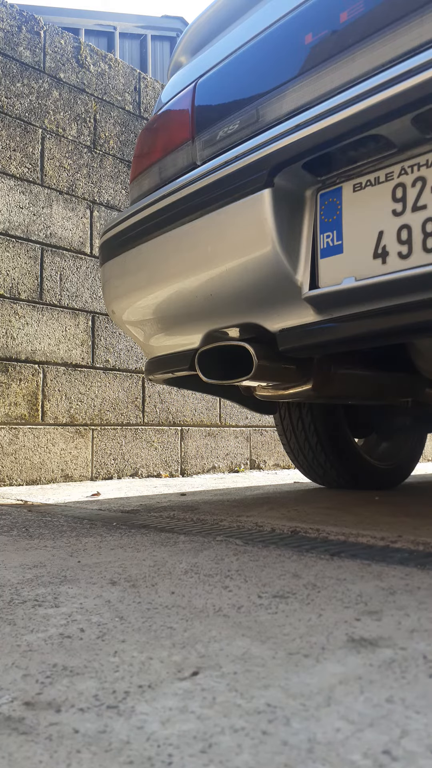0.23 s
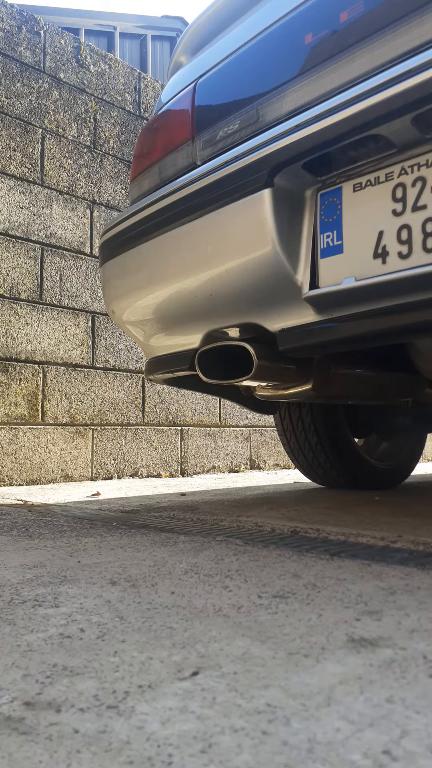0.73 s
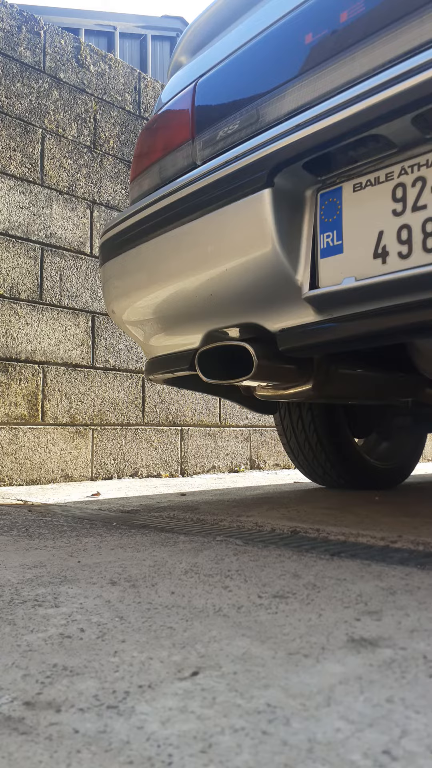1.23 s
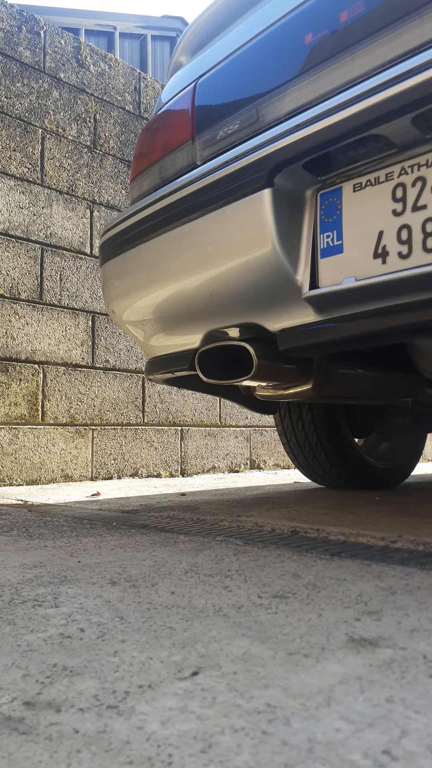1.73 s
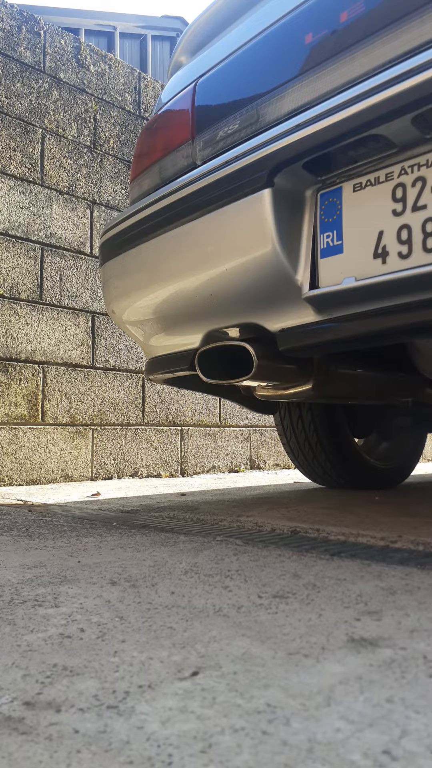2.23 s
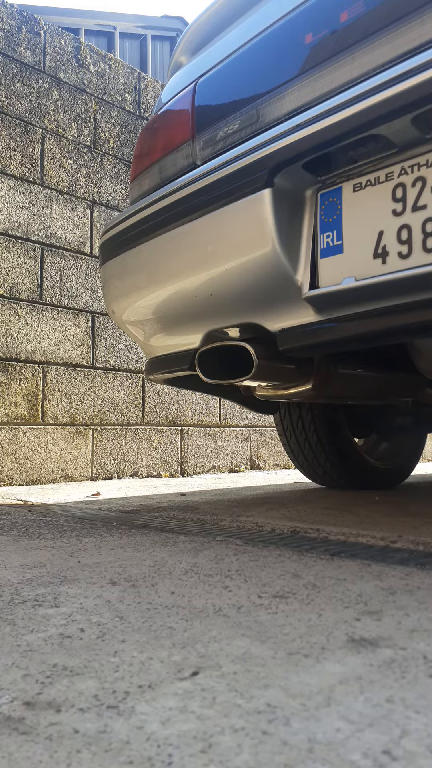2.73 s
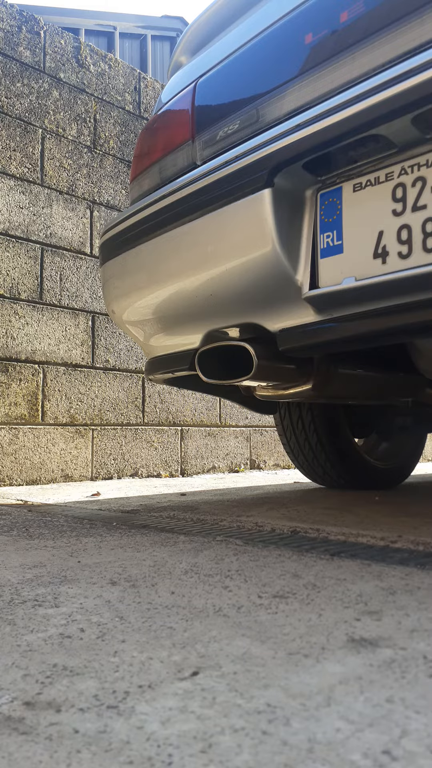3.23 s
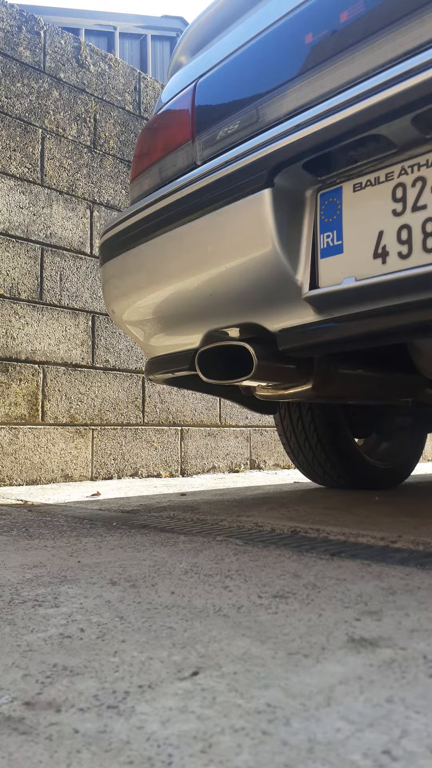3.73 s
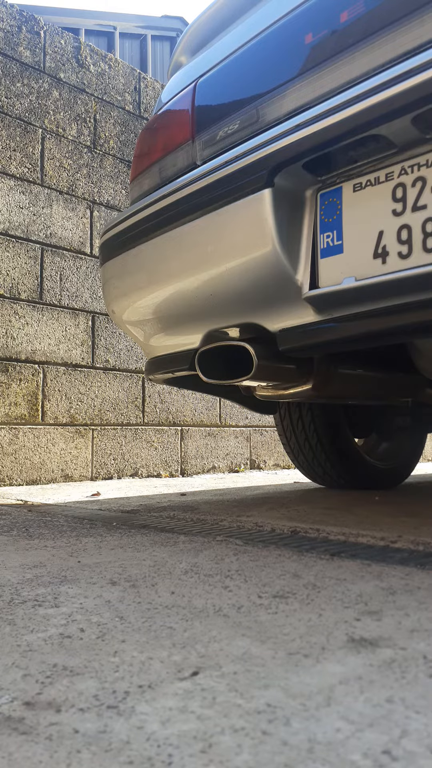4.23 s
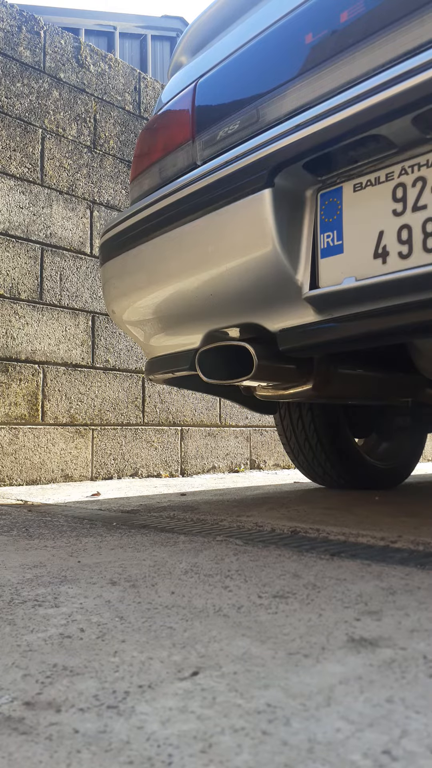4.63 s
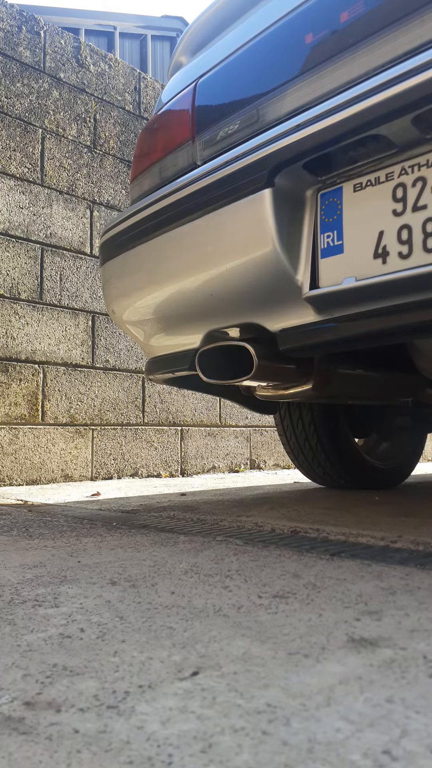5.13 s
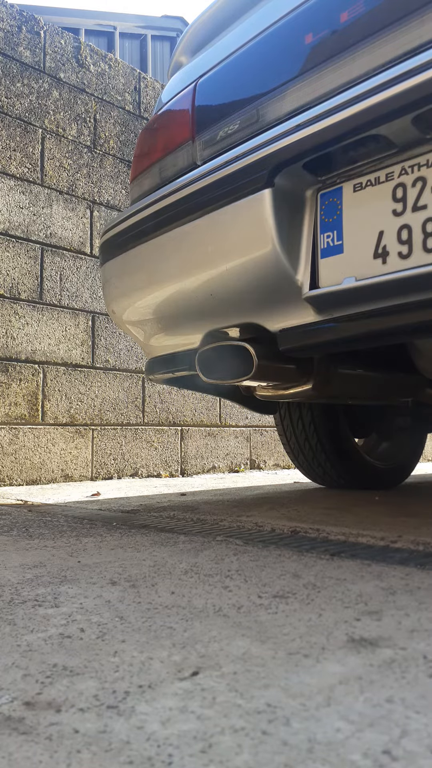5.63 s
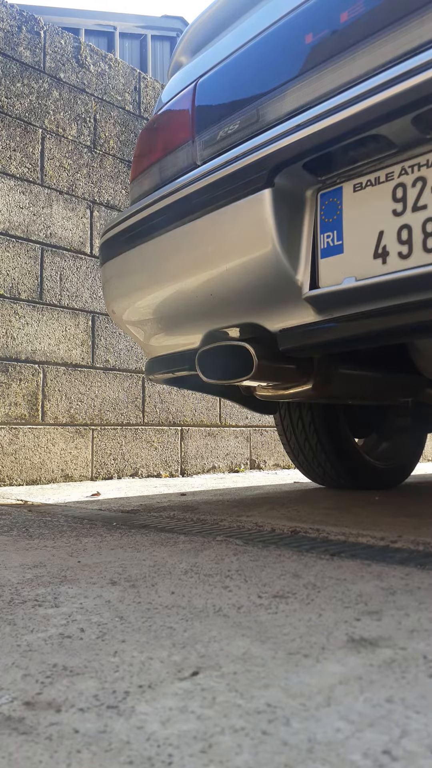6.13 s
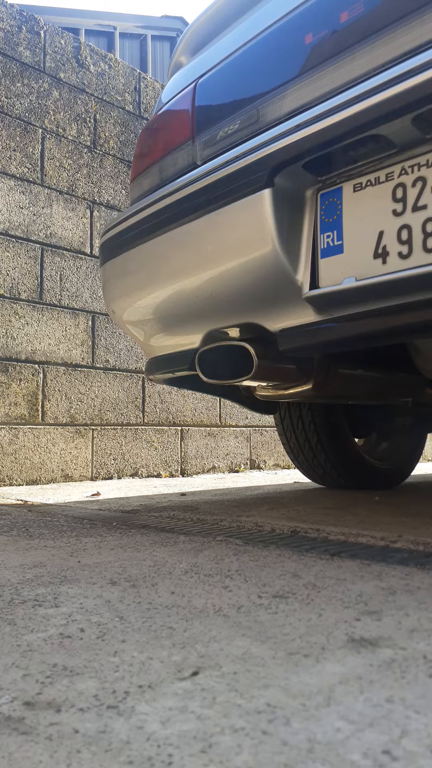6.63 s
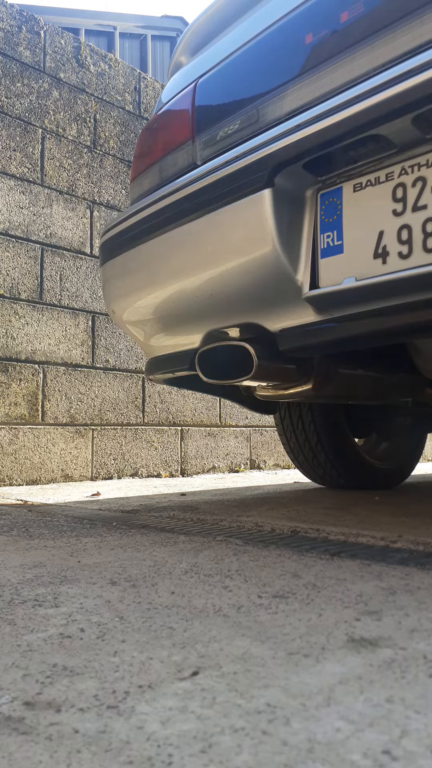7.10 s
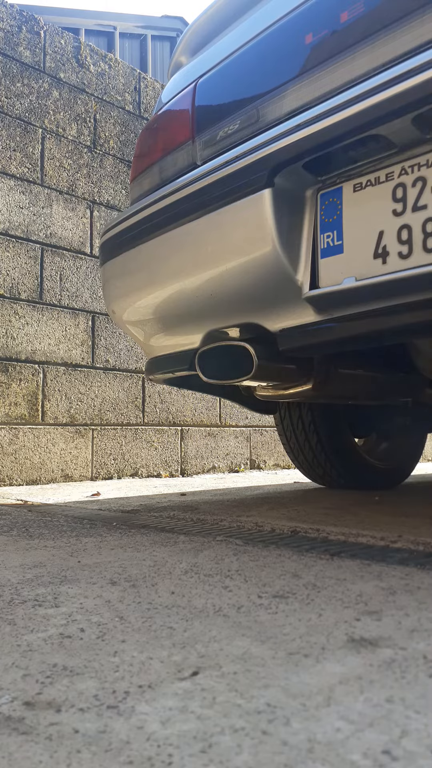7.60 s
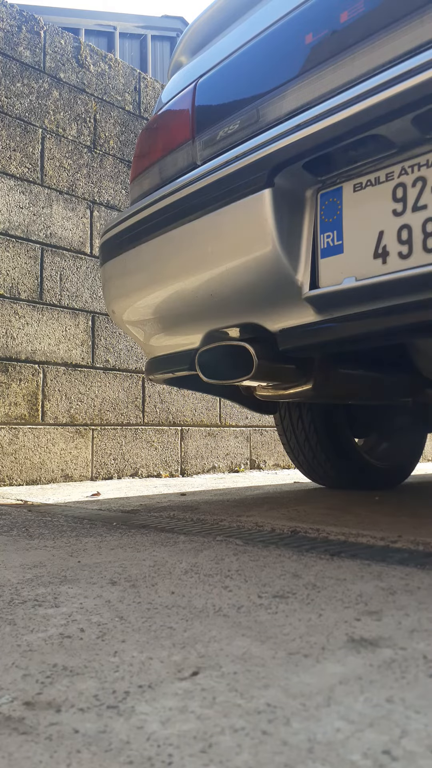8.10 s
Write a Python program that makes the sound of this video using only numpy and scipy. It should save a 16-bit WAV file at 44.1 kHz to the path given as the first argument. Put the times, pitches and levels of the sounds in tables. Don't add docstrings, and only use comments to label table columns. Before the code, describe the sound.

A car door slams, birds chirp in a walled yard, a fuel pump hums, then the starter whines briefly and the engine catches into a fast burbling idle.

```python
import sys
import numpy as np
from scipy import signal
from scipy.fft import rfft, irfft
from scipy.io import wavfile

SR = 44100
rng = np.random.default_rng(int(sys.argv[2]) if len(sys.argv) > 2 else 0)


def to_wav(s):
    ch = np.atleast_2d(s).T
    pcm = np.round(np.clip(ch, -1, 1) * 32767)
    wavfile.write(sys.argv[1], SR, pcm.astype(np.int16))


N = 368676
T, HZ = np.arange(N) / SR, np.fft.rfftfreq(N, 1 / SR) + 1e-3

# [t/s, level/dB]
STARTER = [
    (3.893, -40),
    (3.906, -30.5),
    (4.04, -29.5),
    (4.14, -33.5),
    (4.254, -26.5),
    (4.35, -32),
    (4.392, -26.5),
    (4.474, -32),
    (4.52, -26.5),
    (4.855, -30),
]


def undb(db):
    return np.exp(np.asarray(db) * np.log(10) / 20)


def unit(x):
    return x / np.sqrt(np.mean(x ** 2))


def over_hz(table):
    hz, value = np.transpose(table)
    return np.interp(np.log(HZ), np.log(hz), value)


def over_time(table, edge=0.0051):
    s, *columns = np.transpose(table)
    gate = np.clip(np.minimum(T - s[0], s[-1] + edge - T) / edge, 0, 1)
    return [np.interp(T, s, c) for c in columns] + [gate]


def walk(rate, size=N):
    knots = rng.standard_normal(int(size / SR * rate) + 2)
    return np.sqrt(3 / 2) * np.interp(T[:size] * rate, np.arange(len(knots)), knots)


def plain(colour):
    return unit(irfft(rfft(rng.standard_normal(N)) * undb(over_hz(colour)), N))


def hiss(colour, flicker_db):
    white = rfft(rng.standard_normal(N)) * undb(over_hz(colour))
    octave = np.clip(np.log2(HZ / 30), 0, 9)
    out = 0
    for k in range(10):
        band = irfft(white * np.clip(1 - abs(octave - k), 0, 1), N)
        out = out + undb(flicker_db * walk(9)) * band
    return unit(out)


def tone(hz, wobble):
    size = np.size(hz) if np.ndim(hz) else N
    turns = np.cumsum(hz * (1 + wobble * walk(150, size=size))) / SR
    return np.sqrt(2) * np.sin(2 * np.pi * turns + 6 * rng.random())


def ring(blows, hz, width):
    return blows * 1j * HZ * width / (hz * hz - HZ ** 2 + 1j * HZ * width)


def rings(table, lift_db):
    return 1 + sum(abs(ring(undb(db + lift_db), hz, width)) ** 2 for hz, width, db in table)


def echoes(x, t60):
    tail = rng.standard_normal(SR) * np.exp(-np.log(1000) * T[:SR] / t60)
    return signal.fftconvolve(x, tail / np.linalg.norm(tail))[:N]


def yard():
    # [f/Hz, level/dB per Hz]
    air = [(18, -61), (30, -17), (46, -11), (69, -7.5), (153, -15), (179, -11), (245, -15), (718, -20),
           (2050, -35.5), (5000, -36.5), (5860, -44), (9200, -45), (12000, -41), (14700, -46), (15900, -50)]
    # [t/s, level/dB]
    far_hum = [
        (.88, -78),
        (1.0, -69.5),
        (1.15, -70.5),
        (1.22, -83),
    ]
    far_db, gate = over_time(far_hum)
    hum = tone(1700, .05) + .5 * tone(1120, .05)
    out = undb(-67) * hiss(air, 1.5) + gate * undb(far_db) * echoes(hum, .3)
    seat_s, seat_fade_s = 1, 0.014
    age = np.maximum(T - seat_s, 0) / seat_fade_s
    return out + undb(-47.5) * age * np.exp(-age) * plain([(40, -70), (125, 6), (350, -70)])


def song(notes, bend, late, full):
    hz, gain = np.full(N, 1. * notes[0][2]), np.zeros(N)
    for s, db, from_hz, to_hz, length in notes:
        start, done = int(s * SR), np.linspace(0, 1, int(length * SR))
        hz[start:] = to_hz
        hz[start:start + len(done)] = from_hz + (to_hz - from_hz) * done ** bend
        gain[start:start + len(done)] += undb(db) * np.abs(np.sin(np.pi * done ** late)) ** full
    return hz, gain


def voices(hz):
    pair = tone(.98 * hz, .03) + .7 * tone(1.05 * hz, .03)
    return pair * (1 + .4 * walk(300) + .35 * walk(700))


def birds():
    # [t/s, level/dB, from f/Hz, to f/Hz, length/s]
    chatter = [(2.309, -56, 3780, 3500, 0.061), (2.346, -40.5, 4720, 4350, 0.039),
               (2.372, -35, 4320, 3100, 0.049), (2.42, -42, 4070, 3500, 0.031),
               (2.455, -45, 3920, 3050, 0.035), (2.498, -49, 4980, 4750, 0.022),
               (2.512, -38, 4430, 2950, 0.042), (2.558, -45.5, 5150, 4800, 0.025),
               (2.586, -38, 5220, 3800, 0.019), (2.596, -32.5, 3840, 3450, 0.021),
               (2.66, -42, 4900, 3500, 0.042), (2.692, -40.5, 3080, 2850, 0.0333),
               (2.726, -42, 3810, 3650, 0.021), (2.75, -36.5, 4950, 3000, 0.025),
               (2.766, -41.5, 3250, 3340, 0.046), (2.818, -40.5, 4100, 2700, 0.044),
               (2.886, -40.5, 3890, 2800, 0.041)]
    seep = [
        (1.91, -71, 8140, 6540, 0.19),
        (2.08, -70, 6600, 6900, 0.13),
        (3.092, -43.5, 6560, 7450, 0.27),
        (3.195, -48, 7500, 6640, 0.25),
        (3.75, -72, 7570, 7200, 0.13),
    ]
    whistles = [
        (2.962, -51, 3370, 3460, 0.029),
        (3.025, -56, 3480, 3490, 0.059),
        (3.476, -43.5, 3194, 3370, 0.03),
        (3.506, -42.5, 3340, 3430, 0.048),
        (3.542, -36.5, 3486, 3455, 0.153),
        (3.68, -46, 3400, 3380, 0.056),
        (3.74, -60, 3380, 3490, 0.2),
    ]
    far_bird = [
        (.945, -65, 4260, 3700, 0.07),
        (1.008, -67, 3630, 2980, 0.11),
        (1.27, -62, 4176, 3240, 0.081),
        (1.348, -65.5, 4010, 3360, 0.087),
        (1.65, -66, 4140, 4640, 0.13),
        (1.762, -63.5, 3820, 4100, 0.11),
        (1.852, -71, 3300, 3520, 0.085),
        (3.08, -62, 4130, 4300, 0.098),
        (3.15, -60, 3340, 3700, 0.095),
        (3.4, -66, 4360, 3300, 0.085),
    ]
    hz, gain = song(chatter, .75, 0.9, 1.0)
    trill = tone(61.5, 0.198) / np.sqrt(2)
    near = undb(-6) * gain * (1 + 0.21 * trill) * voices(hz * (1 + 0.03 * trill))
    for notes, bend, late, full, wobble, throb in ((seep, .9, .5, 1.6, .022, .4), (whistles, .6, .8, .6, .002, .35)):
        hz, gain = song(notes, bend, late, full)
        near = near + gain * (1 + throb * walk(60)) * tone(hz, wobble)
    hz, gain = song(far_bird, 0.34, 0.19, 0.43)
    far = gain * voices(hz)
    return undb(-6) * near + undb(-10.5) * far + echoes(undb(-9.5) * near + undb(-3) * far, 0.54)


def relays():
    # [t/s, tick level/dB, thud level re tick/dB]
    clicks = [
        (.6, -64, -7),
        (.853, -60, -11),
        (.9, -69, -14),
        (1.112, -60, -11),
        (1.537, -68, 23),
        (1.587, -46, -20),
        (1.685, -45.5, -15),
    ]
    tick = plain([(2000, -9.0), (6000, -12.5), (16000, -7.5)])
    thud = plain([(80, -15), (200, 9), (500, -29)])
    out = 0
    for s, tick_db, thud_db in clicks:
        age = np.maximum(T - s, 0)
        click = tick * np.exp(-age / 0.019) + undb(thud_db - 3.5) * thud * np.exp(-age / 0.12)
        out = out + (age > 0) * undb(tick_db - 11.5) * click
    return out


def pump():
    # [f/Hz, level/dB per Hz]
    hum = [(40, -20), (100, -6), (400, -3), (1400, -12), (1780, -8), (2200, -48), (4000, -38), (5600, -60),
           (7000, -40), (9000, -60), (11000, -30), (13700, -22), (15900, -26)]
    # [t/s, half length/s, third order level/dB, first order level/dB]
    surges = [
        (1.926, .12, 4, 9.5),
        (3.572, 0.11, 4, 6),
    ]
    on_s, off_s, key_s = 1.58, 3.9, 3.785
    age, left = np.maximum(T - on_s, 0), np.maximum(off_s - T, 0)
    hz = 13790 - 5500 * np.exp(-age / .062)
    hz = hz + 500 * np.exp(-age / .6)
    hz = hz - 1500 * np.exp(-left / .014)
    hz = hz - 190 * np.clip((T - key_s) / .02, 0, 1)

    def flutter(db):
        return undb(db + 2.5 * walk(45))

    swell_db = sum(np.outer(db, np.exp(-((T - s) / half) ** 4)) for s, half, *db in surges)
    third, first = undb(swell_db)
    whine = third * flutter(-64) * tone(hz, 0.0022)
    whine = whine + first * flutter(-72) * tone(hz / 3, 0.0021)
    whine = whine + flutter(-76) * tone(hz * 2 / 3, 0.002)
    for k in (-2, -1):
        whine = whine + undb(-86) * tone(hz + k * hz / 28, .003)
    out = np.minimum(age / .08, 1) ** 2 * (left > 0) * whine
    out = out + (age > 0) * undb(-74) * tone(hz * 4 / 3, .008)
    running = over_time([(1.535, 0), (3.9, 0)])[1]
    return out + running * undb(-61.5) * hiss(hum, 1.5)


def door():
    # [t/s, level/dB]
    hits = [
        (0.027, -19),
        (0.035, -10),
        (0.046, -22.5),
        (.09, -42),
        (.129, -32.5),
        (.215, -48),
        (.29, -44.5),
        (.495, -60),
    ]
    # [f/Hz, level/dB per Hz]
    colour = [(24, -25), (40, -25), (123, -1), (260, 0), (328, -9), (410, 0), (730, -13), (938, -12.5),
              (1060, -18), (4770, -29.5), (7680, -36.5), (9620, -49), (11800, -32), (15900, -44)]
    # [f/Hz, T60/s]
    decay = [(50, 0.81), (200, 0.5), (800, 0.59), (2000, 0.7), (4000, 0.84), (8000, 0.41), (16000, 0.43)]
    # [f/Hz, width/Hz, level/dB]
    panel = [(1250, 43, -2.5), (2750, 140, -6), (3820, 120, -2.5), (4250, 97, -2.5), (5330, 59, -6),
             (7510, 78, 4)]
    white = rfft(hiss(colour, 1.6)) * rings(panel, 3) * .9
    half_octave, t60 = 2 * np.log2(HZ / 40), over_hz(decay)
    age, out = T[:SR], 0
    for k in range(18):
        share = np.clip(1 - abs(half_octave - k), 0, 1)
        centre = share.argmax()
        rate = np.log(1000) / t60[centre]
        rise_s = 0.0033 + 2.6 / HZ[centre]
        swing = 0
        for s, db in hits:
            a = np.maximum(age - s, 0)
            fade = np.exp(-3 * rate * a) + 0.25 * np.exp(-rate * a)
            swing = swing + undb(db - 10.5) * np.minimum(a / rise_s, 1) * fade
        out = out + swing * irfft(white * share, N)[:SR]
    return np.pad(out, (0, N - SR))


def teeth(hz):
    # [multiple of mesh, level/dB]
    orders = [(.225, -9), (1, -7), (1.5, -26), (2, -3), (2.5, -11), (3, -4), (4, -6), (5, -7), (6, -6),
              (7, -13), (8, -8), (9.5, -16), (11, -12)]
    size, out = len(hz), 0
    for k, db in orders:
        level = undb(db + 2.9 * walk(61.2, size=size))
        flutter = 2 / (1 + k) + min(k / 4, .8) * walk(70 * k, size=size)
        out = out + level * flutter * tone(k * hz * (1 + .012 * walk(30, size=size)), 0.02)
    return out


def coasting():
    # [f/Hz, level/dB]
    freed = [(3450, -53), (5650, -51), (7950, -53)]
    age, lines = T[:SR], 0
    for hz, db in freed:
        lines = lines + undb(db + 6.2 * walk(45, size=SR)) * tone(hz * (1 - .3 * age), 0.0195)
    return np.pad(lines * np.exp(-age / .15), (int(4.86 * SR), N))[:N]


def starter():
    # [t/s, f/Hz, level/dB]
    gear = [
        (3.9, 820, -57),
        (3.94, 835, -37.5),
        (4.03, 1005, -37),
        (4.07, 994, -34.5),
        (4.105, 1152, -36.5),
        (4.138, 1355, -31),
        (4.198, 1316, -29.5),
        (4.296, 916.5, -35.5),
        (4.35, 927, -40),
    ]
    # [f/Hz, level/dB per Hz]
    rasp_colour = [(290, -57), (500, -6), (740, -5.5), (1020, 0), (1500, -5.5), (2030, -9.5), (3960, -10.5),
                   (6400, -10), (8000, -12.5), (9400, -25), (11000, -16.5), (15900, -20.5)]
    # [f/Hz, width/Hz, level/dB]
    housing = [(1770, 42, 0), (2220, 140, -2), (2440, 220, -5), (3770, 34, -5), (4170, 130, -5),
               (4450, 46, -3), (5650, 36, -3), (5810, 23, -6), (7280, 100, -4), (12100, 900, -4)]
    mesh_db, gate = over_time(STARTER)
    hz, gear_db, turning = over_time(gear)
    whine = np.zeros(N)
    whine[turning > 0] = teeth(hz[turning > 0])
    bell = .5 + abs(ring(2.7, 1030, 73) + ring(0.66, 1680, 470) + ring(0.97, 8300, 590))
    whine = irfft(rfft(turning * undb(gear_db) * whine) * bell, N)
    whine = whine + 0.99 * echoes(whine, 0.14)
    drone = hiss([(50, -1), (100, 6.5), (160, -18.0), (230, 0.0), (310, -11), (520, -14.0), (900, -47)], 4.5)
    labour_db = -19 * np.log2(hz / 1000)
    drone = undb(-36 + labour_db + 0.73 * (mesh_db + 31.5)) * drone
    drone = drone * np.clip((T - 3.915) / 0.01, 0, 1)
    rasp = undb(mesh_db) * irfft(rfft(hiss(rasp_colour, 0.54)) * rings(housing, -0.7) * 0.81, N)
    strain = turning * undb(-14 * np.log2(hz / 1000))
    walls = abs(ring(0.72, 1360, 48) + ring(0.11, 850, 108))
    rasp = rasp + irfft(rfft(strain * rasp) * walls, N)
    whine = whine + 0.39 * echoes(gate * rasp, 0.21)
    return gate * (rasp + drone) + whine + coasting()


def exhaust(cycles, rate):
    cylinders = [1., .72, 1., .41]
    early = [.00055, .0004, .00055, .00076]
    # [f/Hz, width/Hz, share from short header, share from long header]
    pipe = [(54, 11, .048, -.614), (106, 11, 1., .487), (141, 13, -.327, .315), (163, 11, -.459, .044),
            (201, 39, -.075, .087), (234, 11, .212, .069), (262, 11, -.13, -.244), (314, 11, .137, -.068),
            (356, 27, -.054, -.022), (383, 192, .018, .02), (454, 34, -.06, -.088), (472, 11, .03, .027),
            (543, 11, -.015, -.032), (608, 64, -.003, -.018)]
    cold_pipe = [(52, 14, 1.31, -1.09), (64, 12, 1.34, .84), (66, 60, -2.27, -1.18), (85, 25, .46, 1.55),
                 (108, 14, 0, -1.51), (123, 53, 2.03, 1.45), (128, 94, -.11, .34), (150, 30, -.45, -.43),
                 (190, 60, -.3, -.17), (240, 25, .52, -.1), (280, 60, -.1, .02), (352, 120, .05, .02),
                 (440, 20, .24, .08), (560, 30, .13, .04)]
    # [f/Hz, width/Hz, share]
    empty_pipe = [(62, 10, -.6), (77, 34, 4.3), (88, 110, -4), (128, 65, 2.6), (217, 182, .53),
                  (419, 25, .28)]
    # [f/Hz, level/dB]
    tailpipe = [(40, 0), (70, 1.4), (110, 1), (170, 2.5), (250, 2.26), (350, 3), (450, 2.5), (600, 3.5),
                (800, -10.5), (1600, -55)]
    # [t/s, level/dB, lope between cylinders/dB]
    strength = [(4.5, -32, 2), (4.53, -16, 0), (4.58, -13.5, -2), (4.66, -13, 0.5), (4.74, -13.5, -1.5),
                (4.83, -15.5, 1.5), (4.89, -14.5, 2), (5.08, -12.5, -2.5), (5.3, -15.5, 1),
                (5.42, -15, 1.5), (5.6, -15.5, 2), (5.75, -17, -0.36), (7.3, -15.5, -1.34),
                (8.36, -15.5, 0.2)]
    # [t/s, level scatter/dB, timing scatter/cycles]
    uneven = [(4.5, 1.8, .006), (5.2, .9, .005), (5.6, .5, .002), (8.36, .4, .0012)]
    # [t/s, share]
    warming = [(4.5, 0.02), (4.92, 0.24), (5.17, 0.92), (5.72, 1), (8.36, 0.91)]
    # [f/Hz, level/dB per Hz]
    flare = [
        (4.5, -50),
        (4.62, -39),
        (5.1, -32),
        (5.5, -38),
        (5.9, -50),
        (8.36, -49),
    ]
    tumble_colour = [(90, -35), (200, 5.5), (320, -3.5), (440, -5.5), (700, -12.5), (1200, -46)]
    lone_s, pipe_lag_s = 4.3814, .0112

    firing = np.arange(int(4 * cycles[-1]) + 1)
    at = np.searchsorted(cycles, firing / 4 + 1e-9)
    scatter_db, slip, _ = over_time(uneven)
    chance = rng.standard_normal((len(at), 2)).T
    level_db, lope_db, _ = over_time(strength)
    lope = np.cos(2 * np.pi * (firing * .25 - 0.0081))
    level_db = level_db[at] + lope_db[at] * lope + scatter_db[at] * chance[0]
    blow = undb(level_db) / np.sqrt(rate[at] / 12.17)
    warm = over_time(warming)[0][at]
    shift_s = slip[at] * chance[1] / rate[at] - pipe_lag_s - warm * np.take(early, firing % 4)
    at = at + (shift_s * SR).astype(int)

    header = firing // 2 % 2
    blows = np.zeros((5, N))
    blows[header, at] = warm * blow * np.take(cylinders, firing % 4)
    blows[2 + header, at] = (1 - warm) * blow * undb(49.5)
    blows[4, int(lone_s * SR)] = undb(40)
    short, long, *cold, lone = rfft(blows) * undb(over_hz(tailpipe))
    dull = undb(-4.5 * np.clip(np.log2(HZ / 300), 0, 2))
    late_turns = np.maximum(HZ - 300, 0) * .008 + np.outer([.0011, .0021], HZ)
    cold = cold * dull * np.exp(-2j * np.pi * late_turns)
    long = long * np.exp(-2j * np.pi * HZ * .00435)
    flowing = irfft(sum(ring(a * short + b * long, f, w) for f, w, a, b in pipe), N)
    barks = sum(ring(a * cold[0] + b * cold[1], f, w) for f, w, a, b in cold_pipe)
    barks = irfft(barks + sum(ring(a * lone, f, w) for f, w, a in empty_pipe), N)
    flare_db, flaring = over_time(flare)
    tumble = flaring * undb(flare_db + 5.1 * walk(30)) * plain(tumble_colour)
    flowing = flowing * undb(-16.0) / np.std(flowing[6 * SR:])
    return flowing + barks + 0.32 * echoes(barks, 0.2) + tumble


def engine():
    # [t/s, engine cycles per s]
    speed = [(4.529, 4.559), (4.7, 7.151), (4.9, 7.749), (5.1, 10.995), (5.3, 12.883), (5.45, 12.919),
             (5.7, 12.25), (5.95, 11.951), (6.2, 12.166), (6.5, 12.058), (6.8, 12.074), (7.1, 12.291),
             (7.4, 12.105), (7.7, 12.117), (8.0, 12.24), (8.36, 12.488)]
    # [f/Hz, level/dB per Hz]
    gas_colour = [(180, -30), (300, -19), (379, -17), (447, -7.5), (502, -18), (564, -8.5), (633, -17),
                  (898, -23), (1190, -21.5), (1690, -28.5), (4420, -29.5), (7270, -29), (9330, -39.5),
                  (11600, -30.5), (15900, -37.5)]
    # [f/Hz, width/Hz, level/dB]
    covers = [(1790, 90, -2), (3480, 200, 0), (5200, 350, 2), (5990, 100, -3), (7160, 300, 0)]
    # [multiple of engine cycle, level/dB]
    belt_orders = [(97.5, -57), (148.4, -67), (250.8, -67), (286.3, -70)]
    catch_s, dry_s, oil_s = 4.5285, 4.88, 0.64
    rate = over_time(speed)[0]
    cycles = np.cumsum(rate * (T >= catch_s)) / SR
    dryness = np.clip(1 - (T - dry_s) / oil_s, 0, 1)
    gate = np.clip((T - dry_s + 0.055) / 0.0057, 0, 1)
    puff = 1 + .15 * np.cos(8 * np.pi * cycles + 1.5) + .1 * np.cos(6 * np.pi * cycles + 1.5)
    noise = rfft(hiss(gas_colour, 0.44)) * rings(covers, -4.0) * 0.89
    bright = np.clip(np.log2(HZ / 2000), 0, 1)
    gas = undb(-39 + 4 * dryness) * irfft(noise * (1 - bright), N)
    valves = undb(-43 + 12.5 * dryness) * irfft(noise * bright, N)
    belt = 0
    for k, db in belt_orders:
        level_db = db + 2.0 - 8 * np.clip(3 * dryness - 1.2, 0, 1) + min(k / 50, 4) * walk(20)
        belt = belt + undb(level_db) * tone(k * rate, 0.00516)
    squeal = np.clip((rate - 12.62) / 0.21, 0, 1)
    belt = belt + undb(-54) * squeal * tone(166.5 * rate, 0.003)
    return exhaust(cycles, rate) + gate * (puff * (gas + valves) + belt)


def microphones(sources):
    # [f/Hz, left minus right level/dB]
    balance = [(60, 3.5), (110, 3.5), (200, 3.7), (380, 2.8), (700, 1.5), (1290, -2.5), (2380, -2.0),
               (4400, -1.0), (8120, -2.5), (15000, -4.5)]
    # [f/Hz, correlation]
    likeness = [(60, 0.999), (130, 0.998), (290, 0.985), (640, 0.91), (1410, 0.55), (3100, 0.22),
                (6820, -0.01), (15000, -0.34)]
    mid = rfft(sources)
    s = 1j * HZ / 50
    mid = mid * s ** 4 / (s * s + .77 * s + 1) / (s * s + 1.85 * s + 1)
    mid = mid * (HZ < 15920)
    smear = rng.standard_normal(16000) * np.exp(-np.arange(16000) / 2300)
    alike = np.clip(over_hz(likeness), -.9, 1)
    side = np.sqrt((1 - alike) / (1 + alike)) * rfft(smear / np.linalg.norm(smear), N)
    tilt = undb(over_hz(balance) / 2)
    return irfft(mid[:, None] * np.array([(1 + side) * tilt, (1 - side) / tilt]), N)


def scene():
    around = yard() + birds() + relays() + pump() + door()
    car = starter() + engine()
    car, around = microphones([car, around])
    return around + car * (T > STARTER[0][0])


def top_cut(x):
    return signal.sosfilt(signal.butter(12, 15920, fs=SR, output="sos"), x)


def record(dry):
    rounded = np.tanh(dry / 1.923) * 1.832
    return top_cut(rounded)


dry = scene()
out = record(dry)
to_wav(out)
```